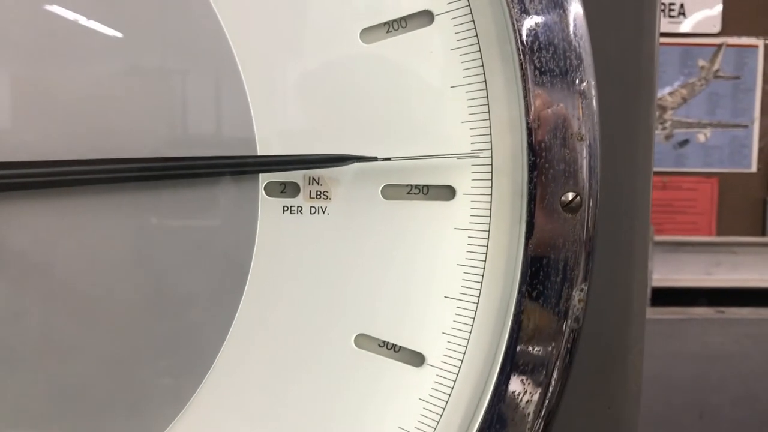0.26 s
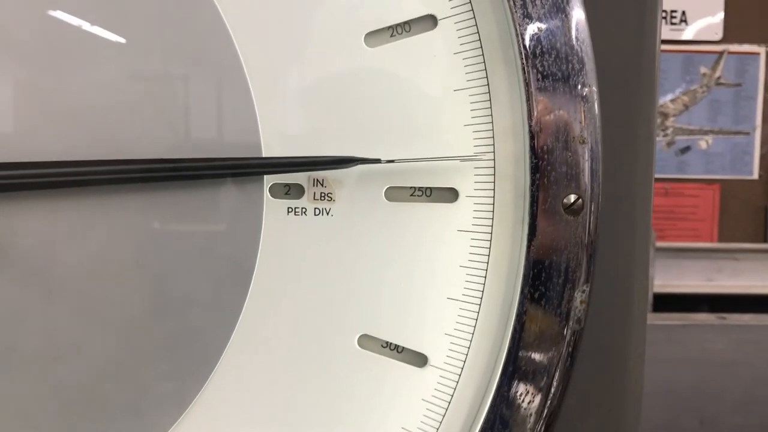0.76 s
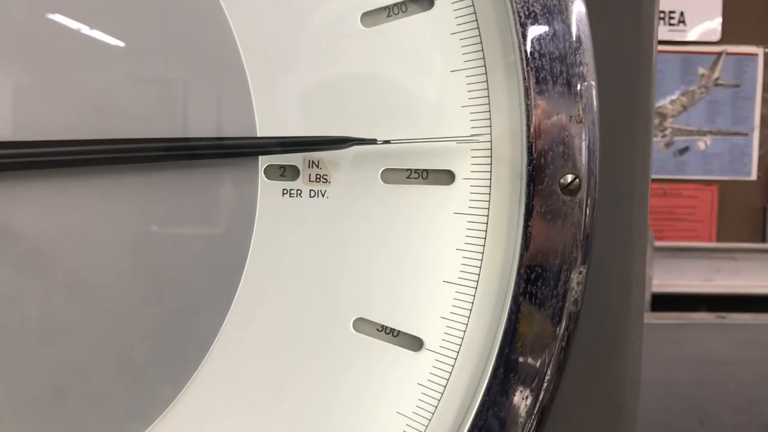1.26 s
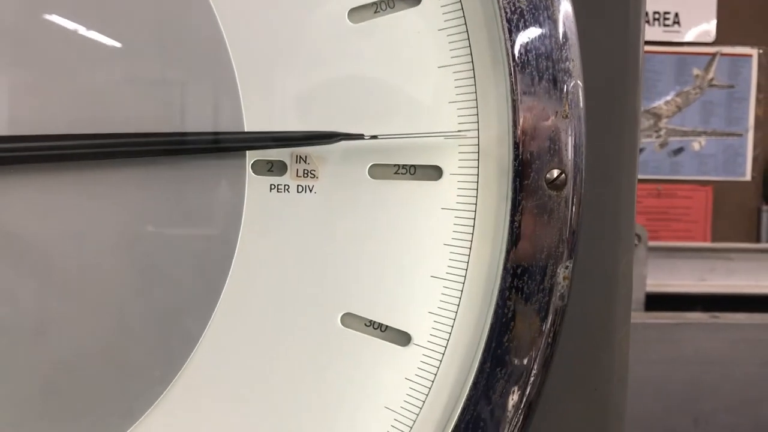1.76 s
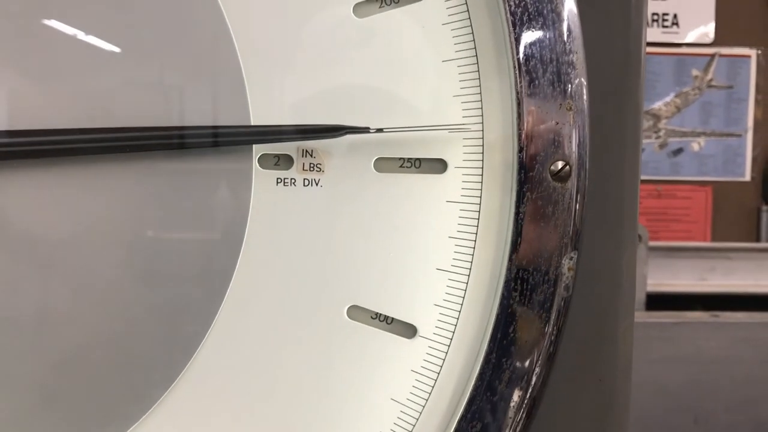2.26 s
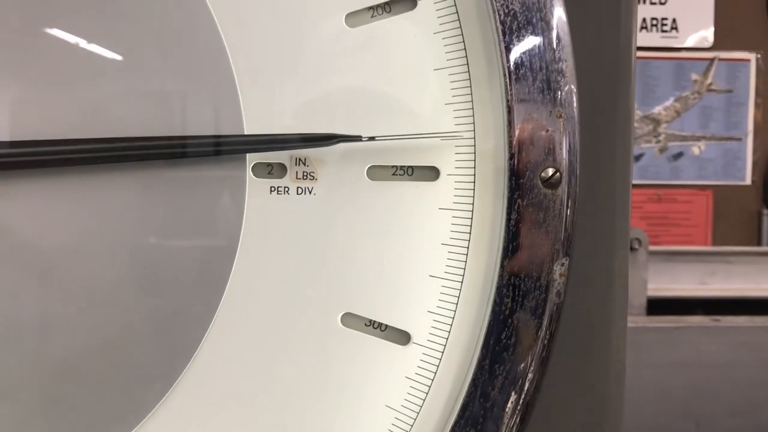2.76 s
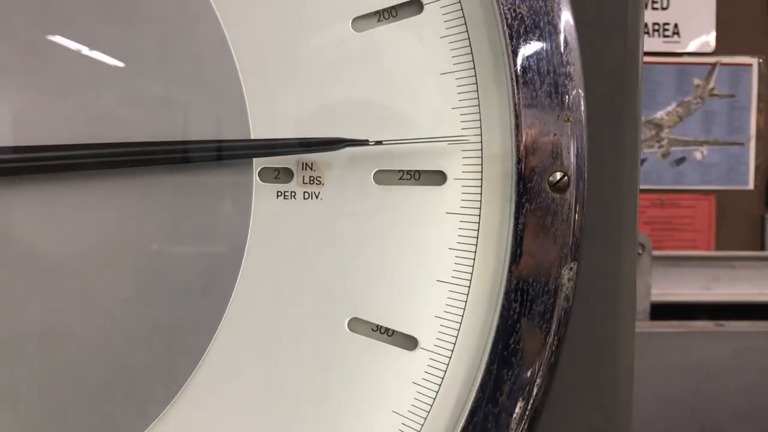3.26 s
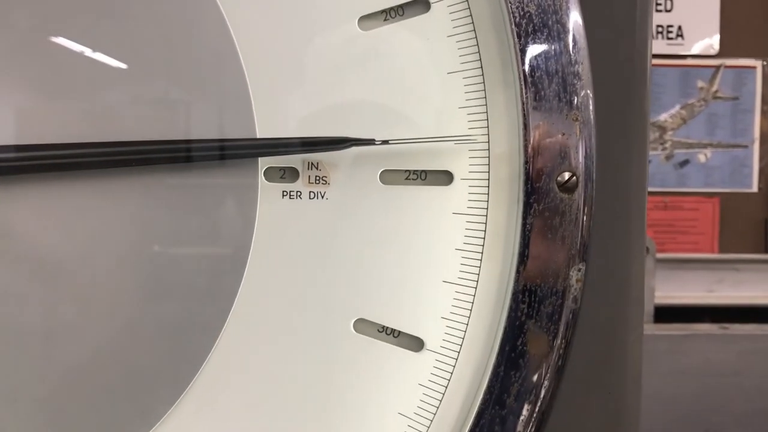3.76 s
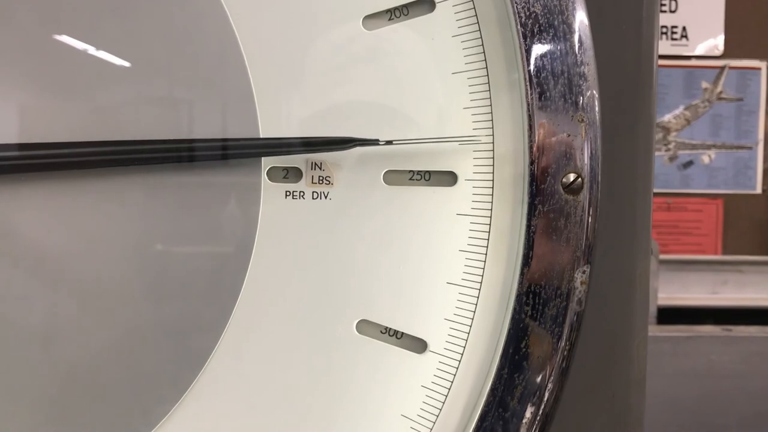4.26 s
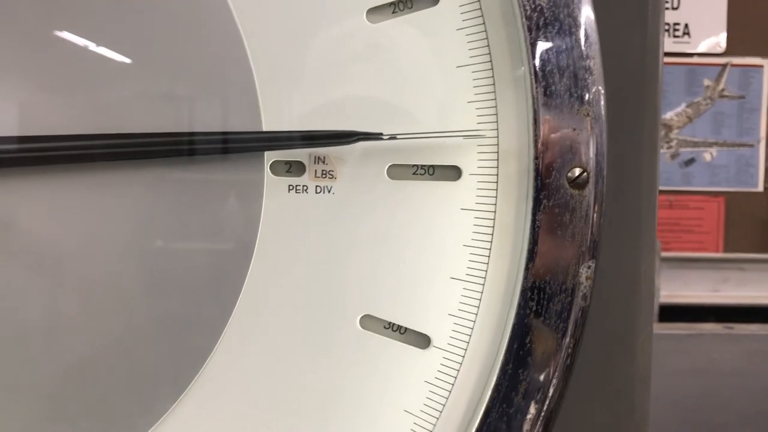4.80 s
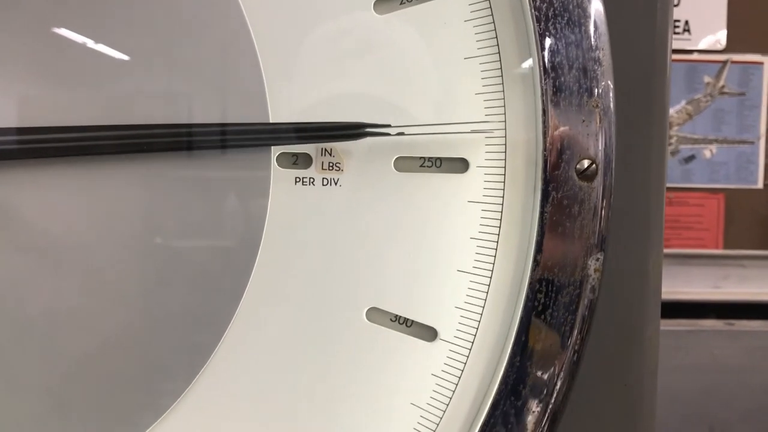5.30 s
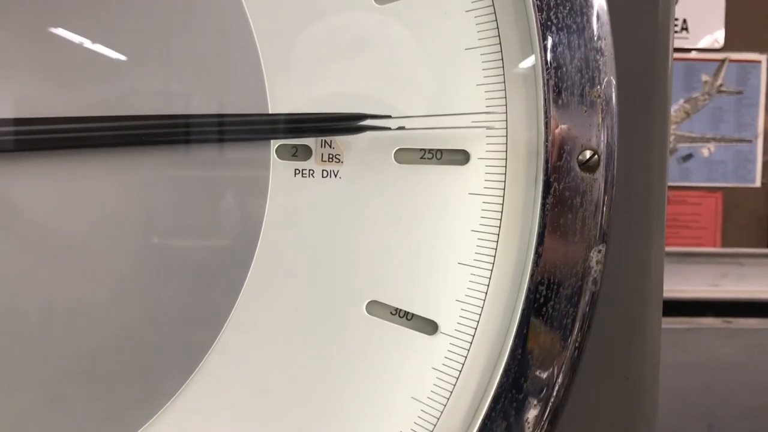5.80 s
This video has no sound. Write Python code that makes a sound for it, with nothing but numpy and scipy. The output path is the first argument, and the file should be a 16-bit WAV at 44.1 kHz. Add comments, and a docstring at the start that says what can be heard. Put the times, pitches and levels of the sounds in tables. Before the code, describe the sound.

Close to a testing machine in a ventilated lab, room air and a low electric hum are heard first. Soon a stronger drone comes in as the drive starts, with a light rattling buzz and thin tones from the metal covers swelling and fading. The drive is turned up step by step; at the top step the drone is strongest and the fizz dulls. Its low thrum eases slightly near the end.

```python
"""Testing machine in a ventilated lab

One microphone near the machine, over room air and the mains hum of its motor. The loading drive
engages and is turned up in steps: its iron core drones and its laminations chatter once a cycle.
Panel tones swell and fade as the load shifts; at the top step the core pulls tight and the fizz dulls."""
import sys
import numpy as np
from scipy import signal
from scipy.fft import rfft, irfft, next_fast_len
from scipy.io import wavfile
from scipy.ndimage import uniform_filter1d, map_coordinates

SR = 44100
rng = np.random.default_rng(int(sys.argv[2]) if len(sys.argv) > 2 else 0)


def dump_mix(stems):
    """Bounce the given channels to the path in sys.argv[1] as a 16-bit WAV at rate SR."""
    frames = np.atleast_2d(stems).T  # one column per channel
    limited = np.clip(frames, -1, 1)  # hard clip at full scale
    pcm = np.round(limited * 32767).astype(np.int16)
    wavfile.write(sys.argv[1], SR, pcm)


N = 266441
TIME = np.arange(N) / SR
MAINS_HZ = 59.972
DRONE_REFERENCE_DB = -41   # effort_db is the drone's level above this


def from_db(db):
    """Decibels to gain."""
    return 10 ** (np.asarray(db) / 20)


def unit_rms(x):
    """Scale to an rms of 1."""
    return x / np.sqrt(np.mean(x ** 2) + 1e-20)


def curve(rows):
    """Join (seconds, value) points with straight lines."""
    return np.interp(TIME, *np.transpose(rows))


def switch(at_s, rise_s):
    """A smooth step from 0 to 1, centred on at_s."""
    return .5 + .5 * np.tanh((TIME - at_s) / rise_s)


def drift(rate_hz):
    """A slow random wander with a spread of about 1."""
    knots = rng.standard_normal(400)
    return np.interp(TIME * rate_hz + rng.random(), np.arange(len(knots)), knots) * np.sqrt(3 / 2)


def colour(x, spectrum):
    """Filter by a spectrum; unit white noise comes out at its dB per Hz."""
    hz, db = np.transpose(spectrum)
    size = next_fast_len(N + SR // 2)
    bins = np.maximum(np.fft.rfftfreq(size, 1 / SR), 1)
    gain = from_db(np.interp(np.log(bins), np.log(hz), db))
    return irfft(rfft(x, size) * gain, size)[:N] * np.sqrt(SR / 2)


def mains_harmonic(order, frame_hz=248, frame_q=1.7, second_push=0.79, second_at_cycle=.537):
    """One harmonic of two unequal magnetic pushes a cycle, timed by the frame's resonance; rms 1."""
    hz = order * MAINS_HZ
    pushes = 1 + second_push * np.exp(-2j * np.pi * order * second_at_cycle)
    frame = -1 / (1 + 1j * frame_q * (hz / frame_hz - frame_hz / hz))
    return np.sqrt(2) * np.cos(2 * np.pi * hz * TIME + np.angle(pushes * frame))


# The room tone of the lab. Each row: frequency in Hz, level in dB per Hz.
AIR_SPECTRUM = [(20, -104), (29, -79), (45, -79.5), (70, -80.5), (100, -77), (160, -79.5), (280, -82),
                (450, -89.5), (600, -89.5), (750, -95.5), (1000, -92), (1400, -92), (2200, -104),
                (4000, -113), (8000, -121), (15000, -121)]

def ventilation():
    """Moving air fills the room with a steady low noise."""
    return colour(rng.standard_normal(N), AIR_SPECTRUM)


# Hiss just above the room tone. Each row: frequency in Hz, level in dB per Hz.
HISS_SPECTRUM = [(1200, -115), (2000, -99.5), (2350, -109), (2600, -101), (2950, -108), (4200, -112),
                 (5000, -117), (6600, -116), (8000, -122), (10400, -130), (15000, -125)]

def idle_hiss(flutter_db=1.2):
    """A faint hiss that flutters slightly."""
    return colour(rng.standard_normal(N), HISS_SPECTRUM) * from_db(flutter_db * drift(34))


# The motor's hum at the microphone. Each row: time in seconds, level in dB.
HUM_LEVELS = [(0.0, -50), (2.56, -50.5), (4.42, -47), (5.32, -43.5), (5.97, -50.5), (6.04, -52)]
# Faint tones of the rotor. Each row: frequency in Hz, average level in dB.
ROTOR_TONES = [(350.5, -67.5), (618.5, -69.5), (839.6, -77), (989.5, -73), (1199.4, -77), (1237, -75.5),
               (1404, -73), (1501, -78), (1604, -78.5)]

def motor(engaged, octave_db=-52.0, wander_db=2.5):
    """Hum at twice the mains and wavering rotor tones; the hum's octave fades as the drive engages."""
    out = from_db(curve(HUM_LEVELS)) * mains_harmonic(2)
    out += (1 - engaged) * from_db(octave_db) * mains_harmonic(4)
    for hz, db in ROTOR_TONES:
        gain = from_db(db + wander_db * drift(9))
        out += gain * np.sqrt(2) * np.sin(2 * np.pi * hz * TIME + .5 * drift(7))
    return out


# The drive is engaged, turned up four times, then its thrum eases back.
# Each row: time in seconds, glide in seconds, base level of the drone in dB, thrum level in dB.
DRIVE_STEPS = [(1.43, 0.1, -43.5, -64), (2.08, 0.13, -43, -54.5), (2.62, 0.049, -42.5, -54),
               (3.22, 0.04, -41.5, -52.5), (4.29, 0.068, -39.5, -47.5), (5.53, 0.049, -39.5, -50.5)]

def drive_controls():
    """The drive glides from one setting to the next; gives engaged (0-1), drone dB and thrum dB."""
    steps = np.array(DRIVE_STEPS)
    turns = np.array([switch(at_s, glide_s) for at_s, glide_s in steps[:, :2]])
    levels = steps[:, 2:]
    drone_db, thrum_db = levels[0][:, None] + np.diff(levels, axis=0).T @ turns[1:]
    return turns[0], drone_db, thrum_db


# The low rush of the drive. Each row: frequency in Hz, relative level in dB.
RUSH_SPECTRUM = [(25, -105), (45, -81), (150, -87), (300, -90.5), (600, -95), (800, -96.5), (1300, -99),
                 (2200, -108), (5000, -119), (9000, -126), (16000, -132)]

def drive_rush(effort_db, tight, gain_db=5.5, growth=4.4, tight_db=-6.0):
    """A rush that rises steeply with the drone and drops a few dB once the core is tight."""
    noise = colour(rng.standard_normal(N), RUSH_SPECTRUM)
    return noise * from_db(gain_db + growth * effort_db + tight * tight_db)


# The tones of the machine's covers. Each row: multiple of the mains, relative resting level in dB.
PANEL_TONES = [(12, -76), (15, -75), (17, -73), (18, -72), (19, -72), (20, -79), (22, -82), (25, -72),
               (26, -74), (28, -77), (29, -76), (31, -82), (33, -79), (36, -84), (40, -80), (41, -81),
               (42, -80), (44, -83), (49, -79), (52, -79), (59, -82), (60, -80), (61, -81), (64, -82),
               (69, -82), (72, -85), (77, -83), (78, -84), (83, -82.5), (84, -83), (85, -84)]
# A tone sings out as the load shifts.
# Each row: start and end in seconds, multiple of the mains, relative level it swells towards in dB.
PANEL_SWELLS = [(1.3, 1.48, 72, -75), (1.43, 1.8, 31, -69), (1.43, 3.3, 78, -76), (1.44, 4.27, 18, -66),
                (1.44, 4.2, 17, -67), (1.45, 2.6, 29, -66.5), (1.45, 4.15, 19, -67.5),
                (1.62, 2.25, 83, -77), (1.6, 2.68, 28, -66), (1.6, 2.6, 44, -75), (1.7, 2.65, 26, -66.5),
                (1.72, 5.45, 33, -68), (1.8, 2.58, 72, -74.5), (2.3, 3.9, 25, -67), (2.6, 6.1, 15, -68),
                (2.6, 6.1, 22, -70.5), (2.6, 6.1, 31, -72.5), (2.6, 5.5, 41, -73.5), (2.65, 4.26, 83, -75),
                (3.25, 4.15, 26, -68), (4.28, 6.1, 20, -61), (4.3, 5.45, 19, -63.5), (4.3, 5.52, 26, -63.5),
                (4.55, 6.1, 28, -67.5), (4.6, 5.4, 72, -75), (4.65, 5.35, 59, -73.5), (4.8, 5.45, 60, -75),
                (5.33, 5.52, 83, -70), (5.35, 6.1, 29, -66), (5.52, 6.1, 44, -75), (5.52, 6.1, 36, -73),
                (5.56, 5.95, 72, -76), (5.62, 6.1, 59, -75.5), (5.63, 5.83, 83, -73)]

def panels(effort_db, gain_db=0.1, growth=0.12, strike_at=0.24, swell_s=.04, rough_db=5.0):
    """The core knocks the sheet-metal covers once a cycle; high tones die sooner, so they pulse more."""
    cycles_since_knock = (TIME * MAINS_HZ - strike_at) % 1
    flicker_db = rough_db * drift(40)
    out = np.zeros(N)
    for order, rest_db in PANEL_TONES:
        hz = order * MAINS_HZ
        ring_cycles = 2.4 * (1200 / hz) ** 0.87
        ringing = unit_rms(uniform_filter1d(np.exp(-cycles_since_knock / ring_cycles), size=70))
        flicker = from_db(.5 * flicker_db / ring_cycles)
        gain = np.full(N, from_db(rest_db))
        for start_s, end_s, swell_order, swell_db in PANEL_SWELLS:
            if swell_order == order:
                swell = switch(start_s, swell_s) - switch(end_s, swell_s)
                gain += (from_db(swell_db) - from_db(rest_db)) * swell
        phase = 2 * np.pi * (hz * TIME + rng.random()) + 0.2 * drift(3)
        out += gain * flicker * ringing * np.sqrt(2) * np.sin(phase)
    return from_db(gain_db + growth * effort_db) * out


def chatter(spectrum, strike_at, decay_cycles, sustain, fresh, shift_hz, stroke_depth=0):
    """Tiny impacts repeat each mains cycle in a slowly shifting pattern, plus fresh ones; rms 1."""
    def burst(cycles):
        """A decay over a sustained floor, in six strokes: one for each peak of the three phases."""
        since_strike = (cycles - strike_at) % 1
        strokes = 1 + stroke_depth * np.cos(2 * np.pi * 6 * since_strike)
        return (np.exp(-since_strike / decay_cycles) + sustain) * strokes

    cycle_samples = 735
    one_burst = burst(np.arange(cycle_samples) / cycle_samples)
    patterns = rng.standard_normal((40, cycle_samples))
    for _ in range(2):   # sharp impacts feed all harmonics about alike
        harmonics = rfft(patterns)
        patterns = irfft(harmonics / np.abs(harmonics), cycle_samples) * one_burst
    patterns = signal.resample(patterns, 4 * cycle_samples, axis=1)
    cycles = TIME * MAINS_HZ
    row = TIME * shift_hz
    column = cycles % 1 * patterns.shape[1]
    repeating = map_coordinates(patterns, [row, column], order=1, mode="grid-wrap")
    repeating /= np.hypot(row % 1, 1 - row % 1)   # even power while two patterns blend
    new_impacts = rng.standard_normal(N) * burst(cycles)
    return unit_rms(colour(unit_rms(repeating) + fresh * unit_rms(new_impacts), spectrum))


# The laminations from close by: their rattle, their fizz when loose and when tight, and the highest fizz.
# Each row: frequency in Hz, relative level in dB.
RATTLE_SPECTRUM = [(500, -8), (650, -25), (1100, -4), (1750, 6.5), (2150, -6), (2500, -1), (3000, 3.5),
                   (3300, -5), (3600, 1.5), (3900, -7.5), (4900, 1), (5400, -3.5), (6200, -13), (9000, -29)]
LOOSE_SPECTRUM = [(4500, -23), (5500, -15), (6000, -10), (7050, 3.5), (7550, -7.5), (8300, -2.5),
                  (9700, -7.5), (10400, -16), (11000, -7.5), (11900, -15), (12500, -22), (14200, -26),
                  (15100, -15), (16000, -8)]
TIGHT_SPECTRUM = [(4500, -17), (5500, -16), (6400, -26), (7100, 7), (7600, -15.5), (8600, -2.5),
                  (9400, -16), (10300, -48), (11150, -28), (12000, -28), (14200, -41), (15100, -7),
                  (16000, -49)]
TOP_SPECTRUM = [(9000, -28), (11800, 0), (12500, -15), (13300, -2), (14100, -7), (15000, -18), (16000, -9)]
# The highest fizz builds while the core is loose. Each row: time in seconds, average level in dB.
TOP_LEVELS = [(1.5, -83), (2.2, -81), (3.0, -78), (3.45, -77), (3.7, -75), (4.2, -78)]

def laminations(effort_db, tight, flicker_db=.8):
    """The iron sheets rattle and fizz harder with the drive; the fizz dulls once the core is tight."""
    rattle = chatter(RATTLE_SPECTRUM, strike_at=.15, decay_cycles=1, sustain=.35, fresh=.2,
                     shift_hz=1.288, stroke_depth=.4)
    bright = chatter(LOOSE_SPECTRUM, strike_at=.082, decay_cycles=.62, sustain=.28, fresh=.58,
                     shift_hz=1.22)
    dull = chatter(TIGHT_SPECTRUM, strike_at=.039, decay_cycles=.5, sustain=.14, fresh=.7, shift_hz=2.47)
    top = chatter(TOP_SPECTRUM, strike_at=.25, decay_cycles=.35, sustain=.14, fresh=.58, shift_hz=1.7)
    rattle *= from_db(-66.5 + 0.41 * effort_db)
    bright *= from_db(-67 + 1.33 * effort_db)
    dull *= from_db(-72)
    top *= from_db(curve(TOP_LEVELS))
    fizz = (1 - tight) * (bright + top) + tight * dull
    return (rattle + fizz) * from_db(flicker_db * drift(25))   # the buzz's level flickers slightly


# The drone, the loudest sound at the microphone. Each row: multiple of the mains,
# offset from the base level in dB when loose and when tight, extra dB per dB of effort.
CORE_HARMONICS = [(4, -1, -2.5, 0.71), (5, -2, -6, 2.4), (6, -8, -9, 1), (7, -16, -17.5, -0.45),
                  (8, -16.5, -27.5, 0.3), (9, -25.5, -26, 0), (10, -24, -30, 1.2)]

def iron_core(drone_db, thrum_db, tight):
    """The core thrums at three times the mains, under harmonics whose balance moves with the current."""
    effort_db = drone_db - DRONE_REFERENCE_DB
    out = from_db(thrum_db) * mains_harmonic(3)
    for order, loose_db, tight_db, growth in CORE_HARMONICS:
        offset_db = loose_db + tight * (tight_db - loose_db)
        out += from_db(drone_db + offset_db + growth * effort_db) * mains_harmonic(order)
    return out


def scene():
    """Room air, hiss and motor throughout, with the loading drive coming in on top; mono."""
    engaged, drone_db, thrum_db = drive_controls()
    effort_db = drone_db - DRONE_REFERENCE_DB
    tight = switch(at_s=4.28, rise_s=0.018)
    air = ventilation()
    drive = engaged * (drive_rush(effort_db, tight) + iron_core(drone_db, thrum_db, tight))
    buzz = switch(1.39, 0.16) * laminations(effort_db, tight)   # they stir just before the drone swells
    singing = switch(1.37, 0.11) * panels(effort_db)
    return (air + idle_hiss() + motor(engaged) + singing + buzz + drive)[None]


def record(dry):
    """The highest treble is cut steeply."""
    cutoff_hz = 15730
    return signal.sosfilt(signal.ellip(16, .1, 80, cutoff_hz, fs=SR, output="sos"), dry)


dry = scene()
out = record(dry)
dump_mix(out)
```